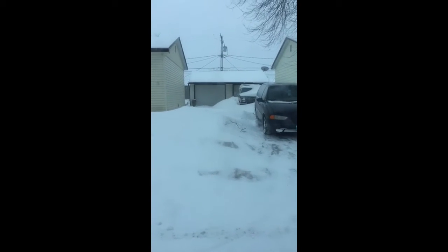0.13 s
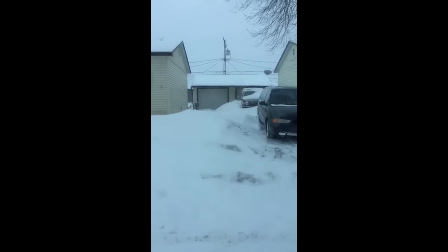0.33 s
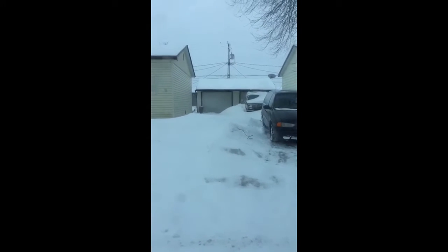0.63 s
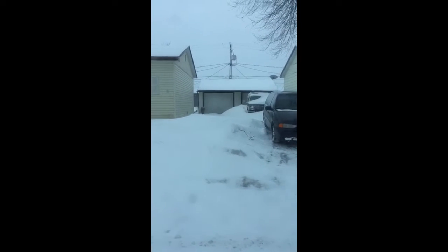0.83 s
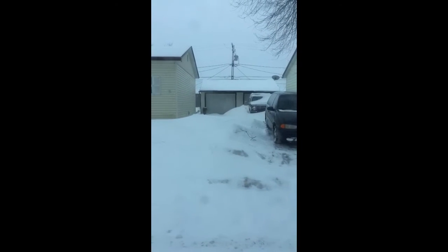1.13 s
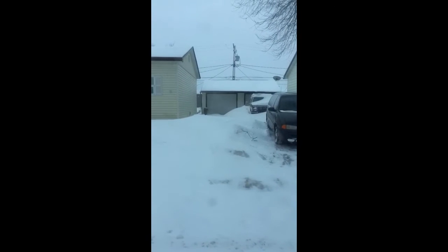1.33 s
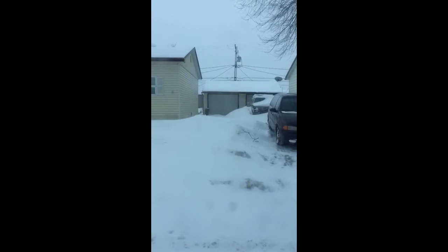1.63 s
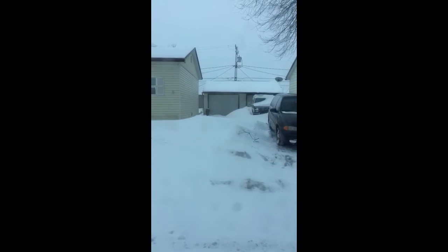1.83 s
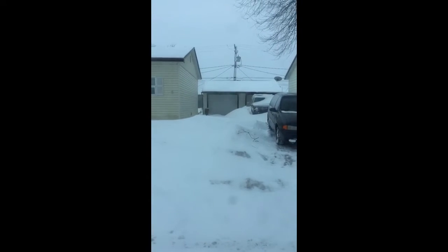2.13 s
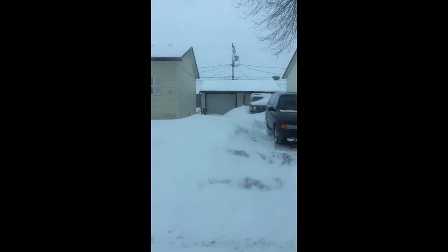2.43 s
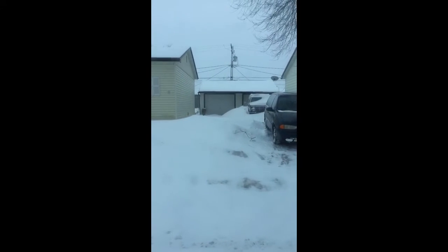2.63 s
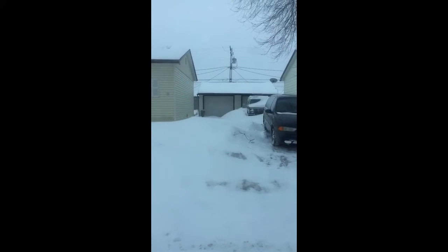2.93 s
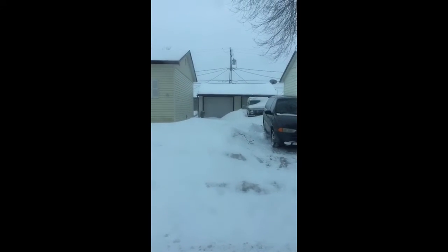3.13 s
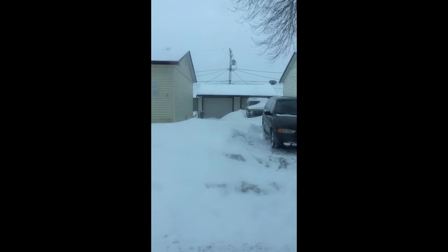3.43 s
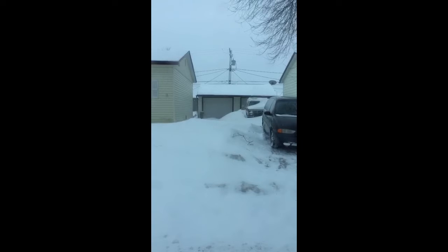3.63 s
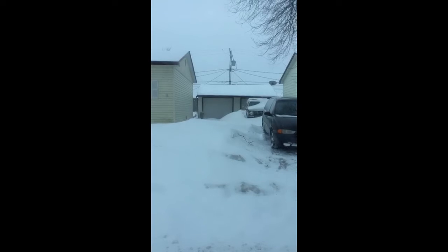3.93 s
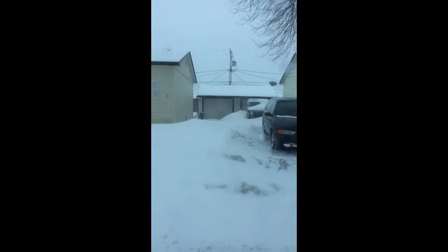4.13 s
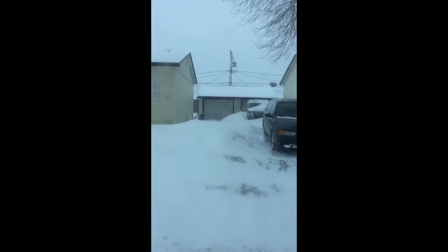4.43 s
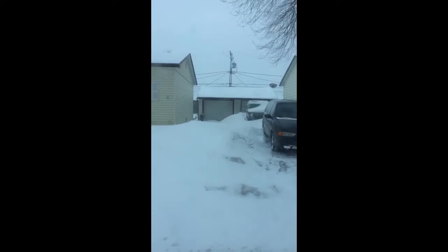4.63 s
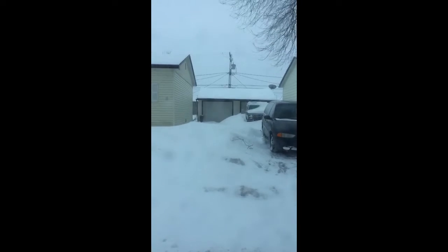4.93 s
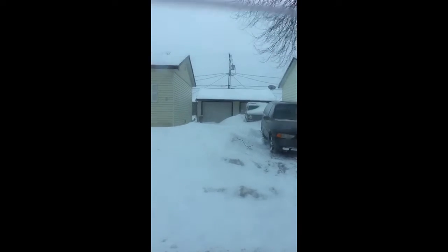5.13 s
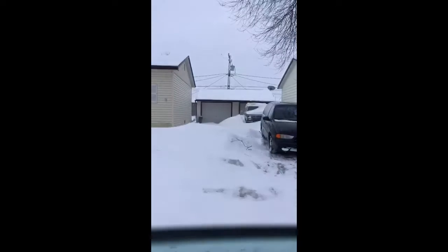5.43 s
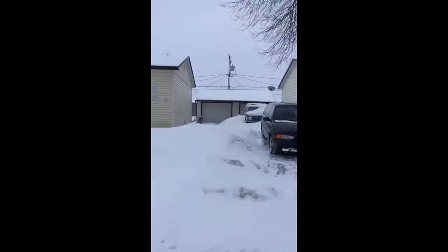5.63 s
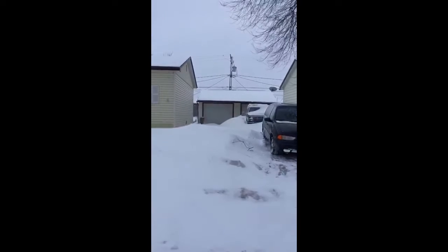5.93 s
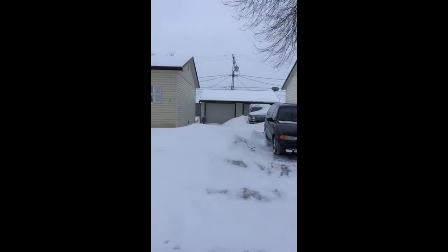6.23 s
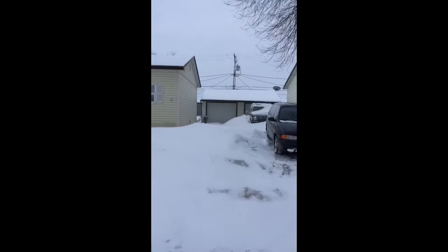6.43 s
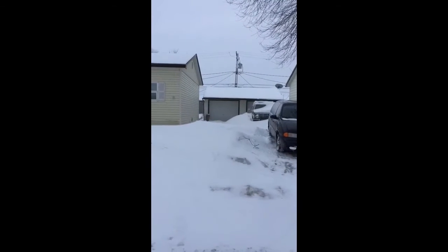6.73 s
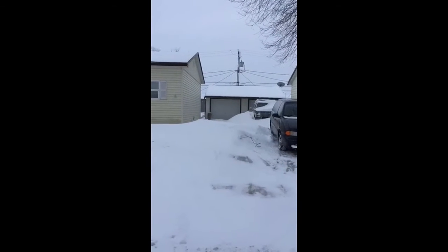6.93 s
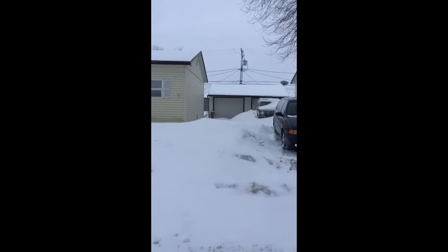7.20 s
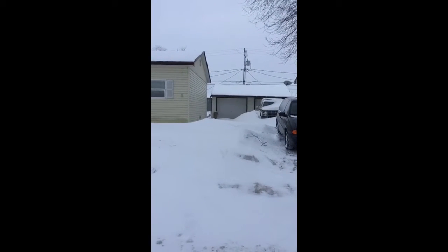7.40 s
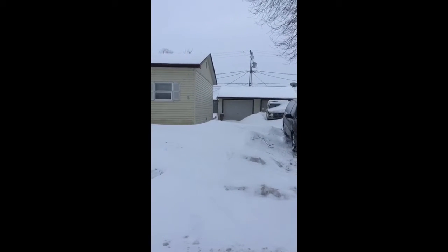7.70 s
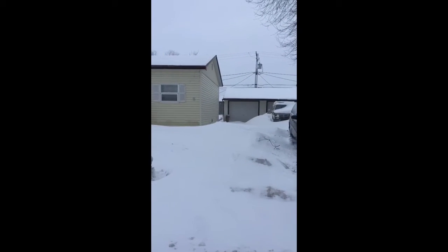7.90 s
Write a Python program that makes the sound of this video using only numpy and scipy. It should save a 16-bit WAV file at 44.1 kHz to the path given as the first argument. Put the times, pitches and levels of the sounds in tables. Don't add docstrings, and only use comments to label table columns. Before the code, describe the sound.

Close inside a parked car in snow, a steady low heater rush with soft wind throbs. A sleeve rustles, a knuckle taps, a switch clicks. Then the icy window breaks free with a loud crackling thump and slides down, motor humming, seal hissing and whistling thinly. Grit snaps, the glass stops, and airy wind and an idling engine's rapid ticking come through the opening.

```python
import sys
import numpy as np
from scipy import signal
from scipy.fft import rfft, irfft, next_fast_len
from scipy.io import wavfile

SR = 44100
rng = np.random.default_rng(int(sys.argv[2]) if len(sys.argv) > 2 else 0)


def store_wav(level_fs):
    pcm = np.round(np.clip(np.atleast_2d(level_fs), -1, 1) * 32767)
    wavfile.write(sys.argv[1], SR, pcm.T.astype(np.int16))


def amplitude_ratio(level_db):
    exponent = np.asarray(level_db, float) / 20
    return 10 ** exponent


N = 355534
T = np.arange(N) / SR


def rms_one(x):
    return x / np.sqrt(np.mean(x ** 2) + 1e-20)


def in_time(rows):
    s, *columns = np.transpose(rows)
    return [np.interp(T, s, c) for c in columns]


def during(rows, fade_s):
    return np.clip(np.minimum(T - rows[0][0], rows[-1][0] - T) / fade_s, 0, 1)


def ramp(start_s, length_s):
    return np.clip((T - start_s) / length_s, 0, 1)


def swells(rows):
    gain = np.zeros(N)
    for s, half_s, db in rows:
        part = slice(max(round((s - half_s) * SR), 0), round((s + half_s) * SR))
        gain[part] += amplitude_ratio(db) * np.cos((T[part] - s) / half_s * np.pi / 2) ** 2
    return gain


def following(level_db, laws):
    return [db + share * (level_db - np.median(level_db)) for db, share in laws]


def drift(rate_hz):
    block = 64
    r = np.exp(-2 * np.pi * block * rate_hz / SR)
    noise = rng.standard_normal(N // block + 2002)
    slow = rms_one(signal.lfilter([1], [1, -2 * r, r * r], noise)[2000:])
    between = np.arange(block) / block
    return (slow[:-1, None] + np.diff(slow)[:, None] * between).ravel()[:N]


def resonate(x, hz, width_hz):
    r = np.exp(-np.pi * width_hz / SR)
    poles = [1, -2 * r * np.cos(2 * np.pi * hz / SR), r * r]
    return signal.lfilter(np.array([1, 0, -1]) * (1 - r * r) / 2, poles, x + 1e-18)


def whistling(hz, width_hz):
    noise = rng.standard_normal(N)
    return rms_one(resonate(resonate(noise, hz, width_hz), hz, width_hz))


def hollows(table, drift_db, rate_hz):
    return sum(amplitude_ratio(db + drift_db * drift(rate_hz)) * whistling(hz, width_hz) for hz, width_hz, db in table)


def sine(hz):
    return np.sqrt(2) * np.sin(2 * np.pi * np.cumsum(hz) / SR)


def surging(voices, wobble, rate_hz):
    return sum((amplitude_ratio(db) + swells(rows)) * sine(hz * (1 + wobble * drift(rate_hz)))
               for hz, db, rows in voices)


def soft_band(octaves, low_hz, high_hz):
    rise, fall = (np.clip((octaves - np.log2(edge)) / 0.3 + 0.5, 0, 1) * np.pi / 2
                  for edge in (low_hz, high_hz))
    return np.sin(rise) * np.cos(fall)


def airy(colour, splits_hz, levels_db, span_s, patchy_db, rate_hz, slow_db=0.0):
    part = slice(round(span_s[0] * SR), min(round(span_s[1] * SR), N))
    length = part.stop - part.start
    size = next_fast_len(length)
    hz = np.fft.rfftfreq(size, 1 / SR) + 1
    octaves = np.log2(hz)
    points_hz, points_db = np.transpose(colour)
    shape = amplitude_ratio(np.interp(np.log(hz), np.log(points_hz), points_db))
    spectrum = rfft(rng.standard_normal(size)) * shape
    together = drift(rate_hz)[part]
    out = np.zeros(N)
    for low, high, level_db in zip(splits_hz, splits_hz[1:], levels_db):
        edges = np.geomspace(low, high, 2 + int(2 * np.log2(high / low)))
        flicker = np.zeros(length)
        for a, b in zip(edges, edges[1:]):
            band = irfft(spectrum * soft_band(octaves, a, b), size)[:length]
            flicker_db = patchy_db * (0.57 * together + drift(rate_hz)[part])
            flicker += band * amplitude_ratio(flicker_db + slow_db * drift(0.85)[part])
        out[part] += amplitude_ratio(level_db[part]) * rms_one(flicker)
    return out


def cracks(table, width, high_db, broad_db, t60, broad_top=0.76, attack_s=0.00046, air_db=-60):
    length = 4096
    out, t = np.zeros(N + length), np.arange(length) / SR
    envelope = amplitude_ratio(-60 * t / max(t60, 0.003)) * np.minimum(t / attack_s, 1)
    for s, peak_db, hz, high_hz in table:
        burst = rng.standard_normal(length) * envelope
        low, high = (resonate(resonate(burst, f, width * f), f, width * f) for f in (hz, high_hz))
        sos = signal.butter(2, [0.5 * hz, broad_top * high_hz], "band", fs=SR, output="sos")
        broad = signal.sosfilt(sos, burst)
        sound = rms_one(low) + amplitude_ratio(high_db) * rms_one(high) + amplitude_ratio(broad_db) * rms_one(broad)
        sound += amplitude_ratio(air_db) * rms_one(resonate(burst, 8700, 2500))
        out[round(s * SR):][:length] += amplitude_ratio(peak_db) * sound / np.abs(sound).max()
    return out[:N]


def blower():
    # (time [s], rumble [dB])
    strain = [(0.0, -35.5), (0.12, -37), (0.57, -36.5), (1.07, -37.5), (1.52, -37.5), (1.8, -38),
              (2.43, -37.5), (3.13, -38), (3.95, -36.5), (4.24, -38), (4.54, -33.5), (4.7, -36.5),
              (5.08, -38), (5.3, -38), (5.6, -39), (6.49, -39), (7.43, -40), (8.06, -38)]
    # (time [s], level [dB])
    draught = [
        (3.95, 0),
        (4.3, 4),
        (5.9, 1),
        (7.0, 5),
        (8.06, 4),
    ]
    # (frequency [Hz], density [dB per Hz])
    rumble_colour = [(13, -42), (22, -28), (38, -8), (76, -3), (112, -2.5), (221, -12.5), (309, -11.5),
                     (390, -13.5), (420, -34.5), (550, -58), (920, -120)]
    vent_colour = [(250, -56), (420, -4.5), (456, -10.5), (663, -8.5), (735, -3), (758, -14.5), (904, -4.5),
                   (1120, -16), (1440, -22.5), (1580, -27), (2250, -32), (2450, -33), (5000, -50.5),
                   (6500, -89.5), (11000, -120)]
    # (frequency [Hz], width [Hz], level [dB])
    duct = [(127.5, 31, -46.5), (312, 52, -56), (790, 49, -57.5), (917.7, 47, -52), (1380, 110, -68.5),
            (2184, 100, -76)]
    rumble_db, = in_time(strain)
    rumble_swing_db = rumble_db - np.median(rumble_db)
    vent_db = -47.5 + 0.78 * rumble_swing_db + in_time(draught)[0]
    vent_swing_db = vent_db - np.median(vent_db)
    rush = airy(rumble_colour, [20, 420], [rumble_db], (0, 9), patchy_db=1.36, rate_hz=13.4)
    rush += airy(vent_colour, [420, 6000], [vent_db - 2.5], (0, 9), patchy_db=2.05, rate_hz=23.0)
    leak_db = -5 * ramp(5.0, 1.0)
    for hz, width_hz, level_db in duct:
        swing_db = rumble_swing_db if hz < 420 else vent_swing_db
        rush += amplitude_ratio(level_db + leak_db + swing_db + 1.3 * drift(4.1)) * whistling(hz, width_hz)
    return rush


def cabin_gusts():
    # (mode [Hz], steady level [dB], swells (time [s], half length [s], level [dB]))
    gusts = [
        (48.5, -47, [(.27, 0.16, -38), (.62, 0.28, -46), (1.47, 0.23, -43.5), (1.71, 0.079, -51), (2.2, 0.31, -41.5), (2.85, 0.21, -39), (3.25, 0.15, -44), (3.37, 0.064, -40), (3.61, 0.064, -43), (3.92, 0.12, -39)]),
        (105.2, -54, [(.28, 0.17, -38), (.72, 0.19, -42), (1.8, 0.064, -37.5), (2.05, 0.094, -39), (2.25, 0.22, -48), (2.86, 0.16, -58), (3.17, 0.083, -49), (3.38, 0.068, -43), (3.68, 0.22, -44.5), (3.98, 0.036, -40)]),
    ]
    buffets = [
        (67.3, -60, [(6.9, 0.064, -42), (7.13, 0.12, -37.5), (7.4, 0.054, -40), (7.76, .1, -40), (8.0, .1, -39.5)]),
    ]
    closed = surging(gusts, wobble=0.0382, rate_hz=4.0) * np.clip((4.02 - T) / 0.021, 0, 1)
    return closed + surging(buffets, wobble=0.051, rate_hz=4.41) * ramp(6.7, 0.1)


def engine():
    # (time [s], hum [dB], ticks [dB])
    opening = [
        (4.2, -38, -20),
        (5.5, -6, -15),
        (6.3, -13, 6),
        (7.2, -5.5, -2.5),
        (8.06, -8, -1),
    ]
    # (multiple of firing rate, level [dB])
    orders = [(2, -40), (3, -47.5), (4, -62), (5, -38), (6, -44.5), (8, -58.5)]
    # (frequency [Hz], width [Hz], level [dB])
    valve = [(3200, 280, 7), (6400, 720, -4), (8770, 340, -13)]
    firing_hz, first_tick_s = 28.54, 6.6095
    hum_db, tick_db = in_time(opening)
    cycles = (T - first_tick_s) * firing_hz
    hum = np.zeros(N)
    for k, db in orders:
        phase = k * 2 * np.pi * cycles + k * k + 0.5 * drift(0.97)
        hum += amplitude_ratio(db + 2.0 * drift(5.7)) * np.sqrt(2) * np.sin(phase)
    ticks = np.zeros(N)
    for lag, lag_db in ((0, -1.5), (0.2, -6)):
        at = np.flatnonzero(np.diff(np.floor(cycles - lag)))
        ticks[at] = amplitude_ratio(lag_db + 3.5 * rng.standard_normal(len(at)))
    puffs = signal.lfilter([1], [1, -0.99], ticks) * rng.standard_normal(N)
    ringing = sum(amplitude_ratio(db + drift(23)) * resonate(puffs, hz, width_hz) for hz, width_hz, db in valve)
    return (T > opening[0][0]) * (amplitude_ratio(hum_db) * hum + amplitude_ratio(tick_db - 38.5) * ringing)


def tappets():
    # (time [s], peak [dB], ring [Hz])
    loud_ticks = [(6.3057, -36, 4890), (6.3664, -31, 6000), (6.4001, -40, 5590), (6.456, -33, 6400),
                  (6.5128, -39, 5300), (6.5398, -53, 7040), (6.5746, -45, 5300), (6.609, -40, 4380),
                  (6.6434, -37, 4300), (6.685, -38, 5290), (6.7198, -39, 6540), (6.7462, -36, 7200),
                  (6.7907, -43, 5690), (6.825, -33.5, 7000), (6.849, -41, 5840), (6.8869, -45, 6500),
                  (6.9287, -38, 6530), (6.9928, -37.5, 5690), (7.028, -43, 5200), (7.238, -39, 6070),
                  (7.273, -39, 5370), (7.3438, -41, 6780), (7.3784, -40, 6480), (7.39, -39.5, 6540),
                  (7.448, -33, 6000), (7.4836, -37, 6460), (7.5623, -43, 6000), (7.59, -34, 6650),
                  (7.764, -40, 7300), (7.8043, -34.5, 5500), (7.869, -40, 6530), (7.9036, -49, 6400),
                  (7.974, -36, 6400)]
    return cracks([(*row, 8600) for row in loud_ticks], width=0.17, high_db=-6.5, broad_db=0.0,
                  t60=0.019, broad_top=0.88)


def wind():
    # (time [s], level [dB])
    wind_level = [
        (6.35, -47),
        (6.6, -41),
        (6.8, -45),
        (6.92, -45.5),
        (7.03, -44.5),
        (7.25, -46),
        (7.43, -45.5),
        (7.56, -46.5),
        (8.06, -47),
    ]
    # (frequency [Hz], density [dB per Hz])
    wind_colour = [(530, -39), (900, -1), (1110, -2.5), (1860, -0.5), (3460, -14.5), (3870, -15),
                   (5760, -21.5), (6780, -23), (9300, -30.5), (9890, -22.5), (10300, -34), (13400, -97),
                   (22000, -120)]
    # (level at mean wind [dB], share [dB per dB of wind])
    wind_hiss = [(-58.5, 1.26), (-58.5, 0.75)]
    # (frequency [Hz], width [Hz], level [dB])
    frame = [(1850, 380, -11), (2320, 400, -10.5), (4140, 880, -17)]
    # (time [s], half length [s], level over the hiss [dB])
    flurries = [
        (6.368, 0.014, 13),
        (6.475, 0.044, -1),
        (6.54, 0.011, -7),
        (6.852, 0.033, 0),
        (7.01, 0.092, -9),
        (7.62, 0.056, -6),
    ]
    # (time [s], half length [s], level over the wind [dB])
    slap = [
        (6.473, 0.041, 2.5),
    ]
    wind_db, = in_time(wind_level)
    flurry_db = 20 * np.log10(1 + swells(flurries))
    low_db = wind_db + 0.064 * flurry_db + 20 * np.log10(1 + swells(slap))
    mid_db, high_db = (db + flurry_db for db in following(wind_db, wind_hiss))
    hiss = airy(wind_colour, [850, 2700, 5000, 11500], [low_db - 3.0, mid_db, high_db], (6, 9),
                patchy_db=2.0, rate_hz=22, slow_db=1.0)
    hiss += amplitude_ratio(low_db) * hollows(frame, 2, 24)
    return hiss * ramp(wind_level[0][0], 0.093)


def sleeve():
    # (time [s], half length [s], level [dB])
    strokes = [
        (2.35, 0.11, -69.5),
        (2.52, 0.19, -67),
        (2.7, 0.06, -70),
        (2.72, 0.22, -63.5),
    ]
    # (frequency [Hz], density [dB per Hz])
    nylon_colour = [(1060, -33), (1800, 4), (2410, -2), (3230, -7), (9090, -18), (10400, -13), (10800, -44),
                    (14000, -61), (22000, -120)]
    rub = airy(nylon_colour, [1700, 4500, 11500], [np.zeros(N), np.full(N, -4.5)], (2, 3),
               patchy_db=1.0, rate_hz=20)
    return swells(strokes) * rub


def knuckle():
    # (time [s], peak [dB], ring [Hz], second ring [Hz])
    taps = [
        (3.0322, -38, 1450, 3300),
        (3.035, -40.5, 1630, 2200),
    ]
    knock = cracks(taps, width=0.27, high_db=-15, broad_db=-9, t60=0.03, broad_top=0.77, attack_s=0.00092)
    return signal.sosfilt(signal.butter(4, 3900, fs=SR, output="sos"), knock)


def switch():
    # (time [s], peak [dB], ring [Hz], second ring [Hz])
    clicks = [
        (3.5625, -34.5, 2030, 3400),
        (3.5632, -42, 3300, 5000),
        (3.5635, -45, 6000, 9400),
        (3.5625, -62, 8800, 10100),
    ]
    creak = [
        (3.558, -47, 2200, 4500),
    ]
    click = cracks(clicks, width=0.28, high_db=-20, broad_db=4.0, t60=0.03, broad_top=0.75, attack_s=0.0028)
    return click + cracks(creak, width=0.4, high_db=-10, broad_db=5.0, t60=0.13, broad_top=0.99,
                          attack_s=0.0073)


def trim():
    # (time [s], half length [s], level [dB])
    rattle = [
        (4.02, 0.024, -36),
        (4.03, 0.013, -32.5),
        (4.05, 0.033, -34),
        (4.078, 0.0087, -38),
        (4.09, 0.015, -30.5),
    ]
    # (frequency [Hz], width [Hz], level [dB])
    trim_hollows = [(447, 150, -3.5), (580, 180, -5.5), (884, 170, -15), (1156, 280, -4)]
    return swells(rattle) * sum(amplitude_ratio(db) * whistling(hz, width_hz) for hz, width_hz, db in trim_hollows)


def door_panel():
    # (time [s], peak [dB])
    thuds = [(4.008, -14), (4.027, -8), (4.032, -6), (4.039, -9), (4.051, -22), (4.083, -9.5), (4.101, -22),
             (4.126, -18), (4.142, -23), (4.192, -26), (6.52, -21)]
    # (frequency [Hz], level [dB], t60 [s])
    panel_modes = [(217, -3, 0.094), (330, -1, 0.04), (433, -3, 0.018), (536, -7, 0.011),
                   (952, -5.5, 0.035)]
    at, out = [round(s * SR) for s, db in thuds], np.zeros(N)
    thud_db = np.array(thuds)[:, 1]
    for k, (hz, level_db, t60) in enumerate(panel_modes):
        pushes = np.full(N, 1e-18)
        pushes[at] = amplitude_ratio(thud_db + level_db - 10.5 + rng.normal(0, 2.2, len(at)))
        r, w = amplitude_ratio(-60 / (t60 * SR)), 2 * np.pi * hz / SR
        out += (-1) ** k * signal.lfilter([0, np.sin(w)], [1, -2 * r * np.cos(w), r * r], pushes)
    return signal.sosfilt(signal.butter(2, 1100, fs=SR, output="sos"), out)


def door_skin():
    # (time [s], half length [s], peak [dB], frequency [Hz])
    flex = [(4.012, 0.0059, -16, 170), (4.0365, 0.013, -9.5, 140), (4.045, 0.007, -20, 150),
            (4.057, 0.014, -12, 112), (4.069, 0.01, -18, 92), (4.087, 0.0068, -9, 153),
            (4.106, 0.013, -17, 99), (4.119, 0.0076, -19.5, 170), (4.131, 0.0092, -16, 85),
            (4.148, 0.017, -21, 75), (4.196, 0.011, -24.5, 105), (6.527, 0.0062, -25, 131)]
    return sum(swells([(s, half_s, db)]) * np.cos(2 * np.pi * hz * (T - s)) for s, half_s, db, hz in flex)


def breaking_ice():
    # (time [s], peak [dB], ring [Hz], second ring [Hz])
    ice = [(4.0055, -32, 10400, 10900), (4.0428, -33, 10400, 10800), (4.0056, -21, 3370, 6500),
           (4.0142, -23, 2580, 4000), (4.0185, -25, 1890, 3000), (4.0253, -13, 2260, 4100),
           (4.0302, -16, 1660, 3000), (4.0305, -29, 5500, 9050), (4.0398, -17, 3880, 5030),
           (4.0424, -12, 1510, 2640), (4.0435, -19, 4100, 8900), (4.0463, -17.5, 1060, 2510),
           (4.0475, -26, 5300, 7900), (4.0545, -19, 1800, 3230), (4.0687, -21, 1300, 3000),
           (4.0757, -16, 4100, 5300), (4.076, -18.5, 1300, 3000), (4.0765, -28, 7440, 9500),
           (4.0815, -28, 5650, 8600), (4.0812, -15.5, 1550, 2920), (4.0848, -17.5, 2770, 5130),
           (4.09, -24, 1500, 2900), (4.1165, -26, 2800, 6300), (4.1212, -22.5, 1750, 3300)]
    return cracks(ice, width=0.15, high_db=-6, broad_db=3.5, t60=0.022, air_db=-14.5)


def lift_motor():
    lift_span = [
        (4.2,),
        (6.5,),
    ]
    surges = [
        (85.8, -50, [(4.2, 0.059, -22.5), (4.57, 0.13, -45), (5.2, 0.44, -37.5), (5.82, 0.072, -33.5), (6.22, 0.19, -39.5)]),
        (330.5, -61, [(4.45, 0.38, -44), (5.9, 0.086, -57), (6.45, 0.079, -56)]),
        (166, -57.5, [(4.44, 0.19, -33), (4.96, 0.48, -44.5), (6.1, 0.091, -43), (6.48, 0.24, -51)]),
        (950, -63.5, [(4.44, 0.23, -45), (4.93, 0.17, -45), (6.25, 0.22, -49.5)]),
    ]
    return amplitude_ratio(-3.0) * surging(surges, wobble=0.01656, rate_hz=5.82) * during(lift_span, 0.042)


def squeals():
    passing = [
        (2980, 160, [(4.32, .1, -46), (4.62, 0.27, -48), (5.14, .06, -52)]),
        (4100, 60, [(5.0, .12, -50.5), (5.47, 0.19, -58)]),
        (6000, 370, [(4.6, .25, -54), (5.0, 0.21, -52), (5.29, .04, -53)]),
        (2125, 74, [(4.5, .08, -49), (5.08, 0.086, -49)]),
        (3540, 120, [(4.35, .1, -58), (4.9, .08, -54.5)]),
        (2000, 850, [(6.58, 0.12, -46.5), (6.73, .09, -49), (7.07, 0.13, -51), (7.38, 0.21, -48.5)]),
        (1300, 410, [(7.7, 0.17, -48.5), (8.0, 0.13, -49.5)]),
        (4000, 710, [(7.61, 0.072, -53.5)]),
    ]
    return sum(swells(rows) * whistling(hz, width_hz) for hz, width_hz, rows in passing)


def grit():
    # (time [s], peak [dB], ring [Hz])
    grains = [(4.225, -41, 1640), (5.483, -25.5, 1790), (5.5327, -26.5, 2280), (5.577, -29, 1980),
              (5.778, -31, 1663), (5.9798, -28.5, 2150), (6.168, -30, 1580), (6.2491, -28, 1930),
              (6.27, -31, 2300), (6.3668, -29, 2430), (6.4454, -30, 1290), (6.455, -26, 1050),
              (6.463, -28, 1700), (6.471, -33, 1300), (6.4785, -28, 1090), (6.486, -32, 2000),
              (6.536, -28.5, 2350), (6.547, -31, 3300), (6.683, -31, 1600), (6.848, -32.5, 3080),
              (6.923, -42, 2080), (6.988, -30, 1370), (7.064, -39, 1850)]
    return cracks([(*row, 4000) for row in grains], width=0.29, high_db=-20, broad_db=2.0, t60=0.021)


def edge_whistle():
    # (time [s], frequency [Hz], level [dB])
    edge = [(4.22, 1610, -52), (4.36, 1655, -49.5), (4.52, 1633, -47), (4.64, 1605, -44), (4.8, 1612, -45),
            (4.9, 1625, -46), (5.03, 1610, -43), (5.14, 1632, -46.5), (5.24, 1630, -49), (5.34, 1624, -45),
            (5.45, 1635, -49), (5.52, 1600, -50), (5.62, 1577, -48), (5.72, 1575, -53), (5.85, 1575, -58),
            (6.0, 1570, -60)]
    hz, level_db = in_time(edge)
    return sine(hz + 4 * drift(14)) * amplitude_ratio(level_db + 1.8 * drift(22)) * during(edge, 0.05)


def sliding_glass():
    # (time [s], friction [dB])
    friction = [
        (4.1, -41),
        (4.2, -41.5),
        (4.44, -41),
        (5.01, -42),
        (5.38, -43),
        (5.6, -43.5),
        (6.29, -45),
        (6.45, -44),
    ]
    # (frequency [Hz], density [dB per Hz])
    slide_colour = [(530, -16), (900, -5), (1250, -5), (1640, -0.5), (1730, 1.5), (2140, -4.5), (2910, -5),
                    (4890, -14), (6120, -14.5), (9590, -18), (10300, -12), (13400, -64), (22000, -120)]
    # (level at mean friction [dB], share [dB per dB of friction])
    slide_hiss = [(-44, 2), (-45, 2)]
    # (frequency [Hz], width [Hz], level [dB])
    pane = [(1066, 47, -14.5), (1350, 34, -17), (1752, 42, -14.5), (2000, 45, -35), (2343, 87, -12.5),
            (2967, 130, -17), (3390, 31, -18), (4270, 530, -12), (5530, 340, -17.5), (5880, 430, -20.5),
            (7040, 320, -23.5)]
    friction_db, = in_time(friction)
    levels_db = [friction_db, *following(friction_db, slide_hiss)]
    hiss = airy(slide_colour, [850, 2700, 5000, 11500], levels_db, (4, 7),
                patchy_db=1.32, rate_hz=36, slow_db=0.9)
    hiss += amplitude_ratio(friction_db) * hollows(pane, 2.5, 5.7)
    return hiss * ramp(4.005, 0.11) * np.clip((friction[-1][0] - T) / 0.03, 0, 1)


def scene():
    outside = cabin_gusts() + engine() + tappets() + wind()
    cabin = blower() + sleeve() + knuckle() + switch()
    door = trim() + door_panel() + door_skin() + breaking_ice()
    window = lift_motor() + squeals() + grit() + edge_whistle() + sliding_glass()
    return np.tile(outside + cabin + door + window, (2, 1))


def ragged_top(x):
    hz, s, frames = signal.stft(x, SR, "cosine", 2048)
    treble = np.abs(frames[hz > 8000]).mean(axis=0)
    sudden = treble > 1.5 * signal.medfilt(treble, 9)
    chance = (0.8 + 1.0 * (s > 6.5)) * rng.standard_normal(len(s))
    steps = np.round(chance - 1.5 * (s > 6.9) + 4 * sudden)
    frames *= amplitude_ratio(-7 * np.clip((hz[:, None] - 9700) / 900, 0, 1))
    frames *= hz[:, None] < np.minimum(10250 + 170 * steps, 10900)
    return signal.istft(frames, SR, "cosine", 2048)[1][:N]


def unlike(mid):
    # times [s], band (low [Hz], high [Hz]), level under the band [dB]
    wide = [6.391, 6.84, 7.47, 7.82], (300, 10300), -18
    hit_frames = [3.57, 4.03, 4.09], (1800, 10400), -19
    treble = [5.22, 5.28, 7.66], (4600, 9800), -1
    middle = [4.45, 5.1, 5.8, 7.36], (5500, 7100), 1.5
    top = [6.03, 6.29], (7600, 9800), -1.5
    side, hz, window = np.zeros(N), np.fft.rfftfreq(2048, 1 / SR), np.hanning(2048)
    for times, (low_hz, high_hz), level_db in (wide, hit_frames, treble, middle, top):
        for s in times:
            frame = slice(round(s * SR) - 1024, round(s * SR) + 1024)
            band = rfft(mid[frame] * window) * ((hz > low_hz) & (hz < high_hz))
            scrambled = irfft(band * np.exp(2j * np.pi * rng.random(len(hz))))
            side[frame] += amplitude_ratio(level_db + 2.5) * scrambled * window
    return side


def low_pass(x):
    return signal.sosfilt(signal.butter(12, 16000, fs=SR, output="sos"), x)


def record(dry):
    mid = dry[0] + amplitude_ratio(-72) * signal.lfilter([1], [1, -0.4], rng.standard_normal(N))
    mid = signal.sosfilt(signal.butter(3, 38, "high", fs=SR, output="sos"), mid)
    mid = ragged_top(mid)
    glitch_s = 8.0208
    mid += amplitude_ratio(-28) * (T >= glitch_s) * np.exp(-np.abs(T - glitch_s) / 0.0004)
    mix = mid + unlike(mid) * [[1], [-1]]
    return low_pass(mix)


dry = scene()
out = record(dry)
store_wav(out)
```